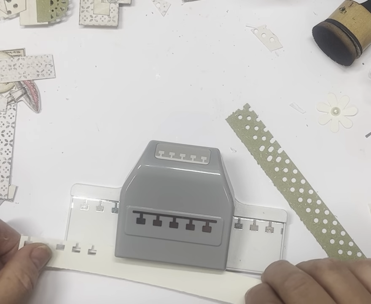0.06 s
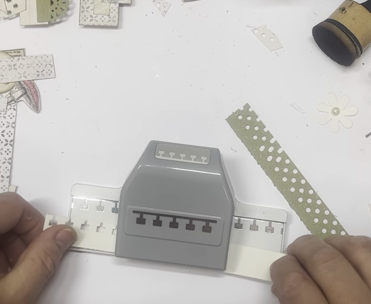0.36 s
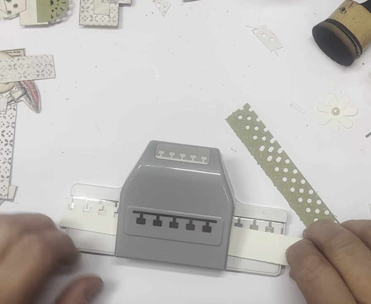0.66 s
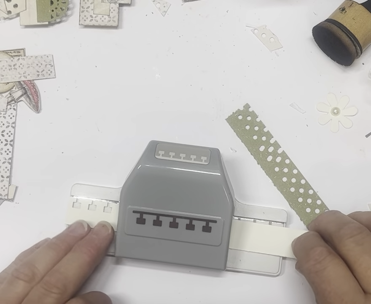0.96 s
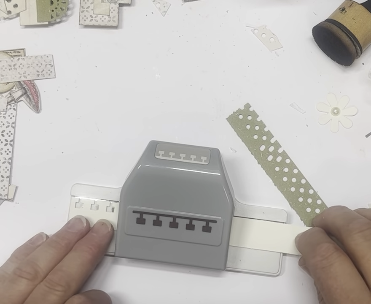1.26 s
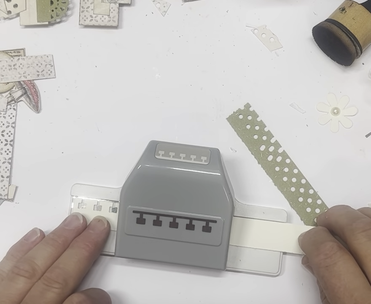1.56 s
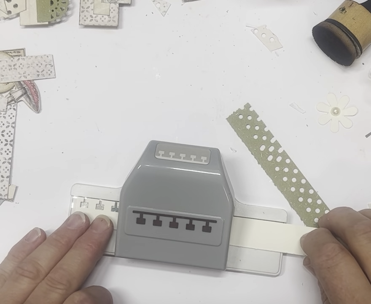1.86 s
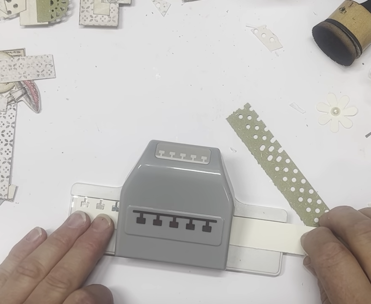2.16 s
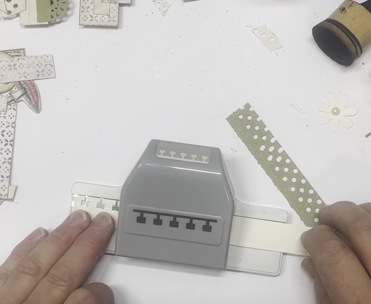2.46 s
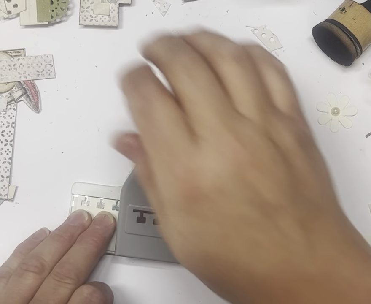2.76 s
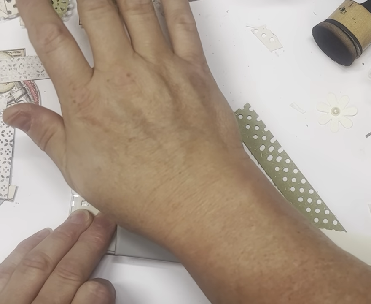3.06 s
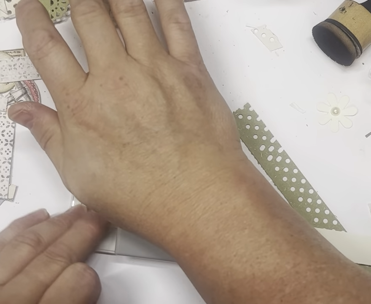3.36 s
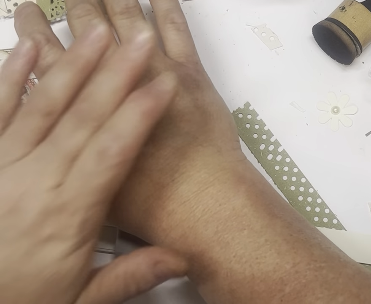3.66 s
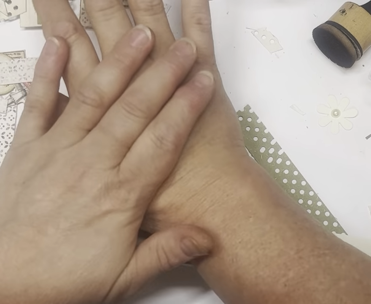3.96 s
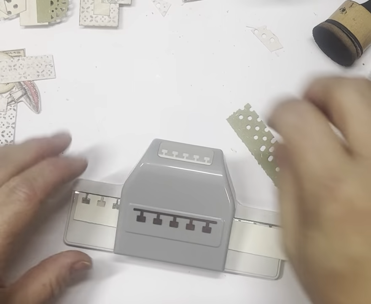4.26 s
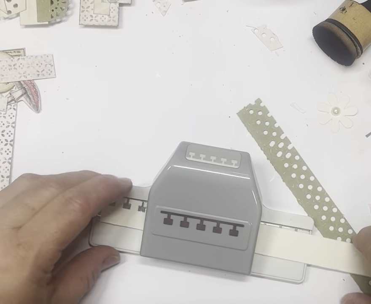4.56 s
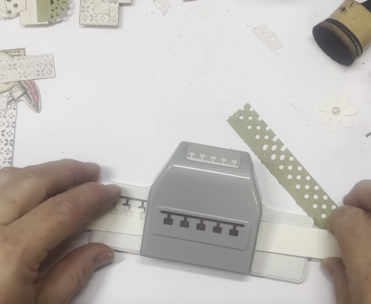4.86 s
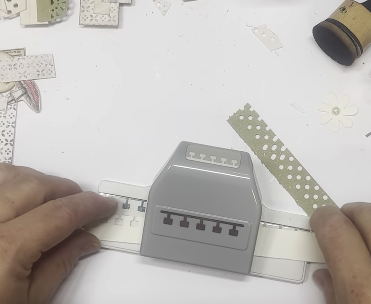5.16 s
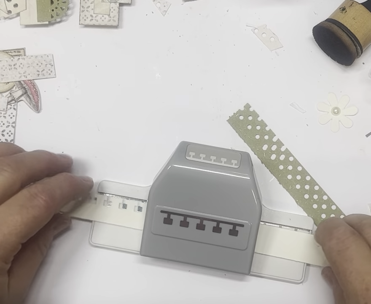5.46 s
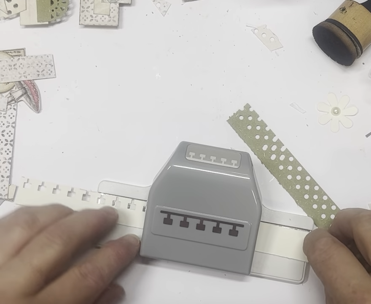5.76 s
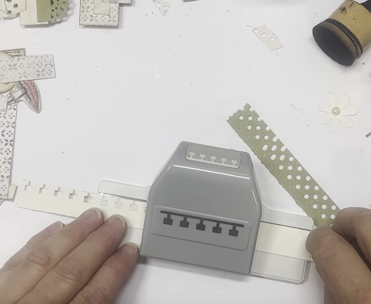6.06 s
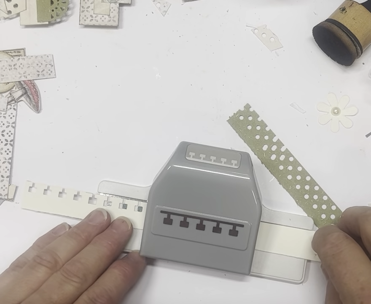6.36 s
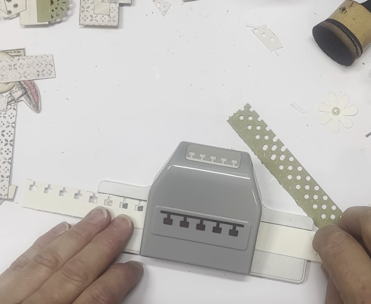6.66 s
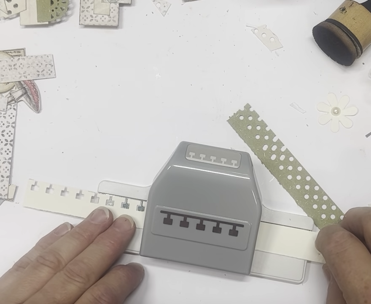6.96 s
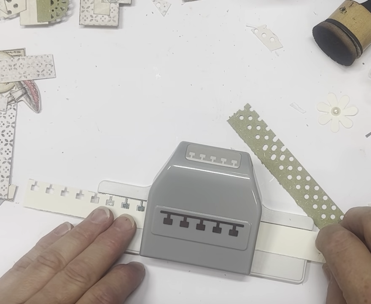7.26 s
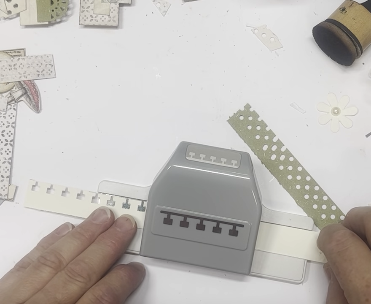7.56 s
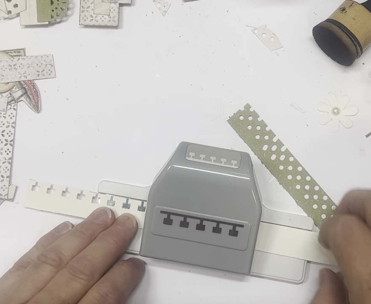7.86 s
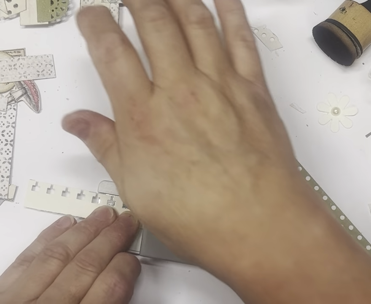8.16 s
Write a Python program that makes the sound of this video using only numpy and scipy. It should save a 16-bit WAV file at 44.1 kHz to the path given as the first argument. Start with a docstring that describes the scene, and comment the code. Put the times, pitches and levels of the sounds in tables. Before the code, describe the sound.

Over a low machine hum in a small room, a paper strip faintly rubs, ticks and squeaks as it is fed into a plastic hand punch. A palm lands softly on the lever, then the punch snaps through with one loud clunk that makes the desk boom. It releases with a short scrape and a faint spring ring. The strip slides along and the palm lands again, all close to the microphone.

```python
"""Over a low machine hum in a small room, a paper strip rubs, squeaks and ticks into a plastic hand punch. At 3
s a palm lands on the lever. At 3.8 s the dies snap through the paper and the housing clunks; the desk booms,
loose things on it shudder, and a limiter ducks. The dies scrape back and the return spring rings. From 4.4 s
the strip is slid along, and at the very end the palm lands again."""
import sys
import numpy as np
from scipy import signal
from scipy.fft import rfft, irfft, next_fast_len
from scipy.io import wavfile
from scipy.ndimage import uniform_filter1d, minimum_filter1d

SR = 44100
rng = np.random.default_rng(int(sys.argv[2]) if len(sys.argv) > 2 else 0)


def store_pcm(level_fs):
    """Save levels as 16-bit WAV."""
    pcm = np.round(np.clip(level_fs, -1, 1) * 32767).astype(np.int16)
    wavfile.write(sys.argv[1], SR, np.atleast_2d(pcm).T)


N = 366030
TIME = np.arange(N) / SR
CUTOFF_HZ = 16400


# snap spectrum: f/Hz, level/dB
SNAP_SPECTRUM = [(300, -25.5), (1200, 9.5), (1900, -4.5), (2400, -8.5), (3000, -2.5), (4200, 1),
                 (5300, -3.5), (6700, 0.5), (8500, -3.5), (9800, -14), (13000, -10.5), (15300, -4.5),
                 (17000, -15)]
def punch(snap_gain_db, knock_gain_db, rattle=.13, db_per_octave=49.5):
    """Contacts snap and knock the housing; loose parts rattle with each blow."""
    snaps, blows = np.zeros((2, 2, N))
    for s, snap_db, knock_db, hard_hz in contacts():
        bright_hz = CUTOFF_HZ * 2 ** (snap_db / db_per_octave)   # stronger is brighter
        add(snaps, s, from_db(snap_db) * lowpass(crunch(decay_s=.0046, spread=.16), bright_hz))
        force = signal.unit_impulse(4096) + rattle * crunch(decay_s=.0051, spread=.24)
        add(blows, s, from_db(knock_db) * lowpass(force, hard_hz))
    knocks = from_db(knock_gain_db) * convolve(blows, housing())
    return from_db(snap_gain_db) * colour(snaps, SNAP_SPECTRUM) + knocks


# dies cutting and returning: t/s, snap/dB, knock/dB, knock cutoff/Hz
DIE_CONTACTS = [(3.736, -42, -39, 2480), (3.7491, -28, -12, 1170), (3.7763, -25, -15.5, 1400),
                (3.7803, -16, -5.5, 2604), (3.804, -10.5, -11.5, 2040), (3.809, -10, -6, 2000),
                (4.029, -53, -33.5, 2200), (4.091, -42.5, -39, 1830), (4.106, -32.5, -25.5, 1910)]
# palm on lever: t/s, click/dB, knock/dB, knock cutoff/Hz
PALM_LANDINGS = [(3.038, -44, -28.5, 454), (8.260, -44, -29, 1010)]
# lever end stops, down then up: t/s, first rebound/dB
LEVER_STOPS = [(3.807, -3), (4.094, -29.5)]
def contacts(slack_s=.0058, heel_s=.044, rebound_s=.035, loss_db=10):
    """All impacts in the punch, columns as in DIE_CONTACTS."""
    rows = list(DIE_CONTACTS)
    for s, click_db, knock_db, hard_hz in PALM_LANDINGS:
        rows.append((s, click_db, click_db + 1, 1400))   # lever clicks
        rows.append((s + slack_s, click_db - 5.5, knock_db, hard_hz))   # slack taken up
        rows.append((s + heel_s, click_db - 5.5, knock_db + 1.5, 414))   # heel of the hand
    for s, db in LEVER_STOPS:   # housing rebounds on the desk: dull, no snap
        rows += [(s + (k + 1) * rebound_s, -np.inf, db - k * loss_db, 420) for k in range(2)]
    return [row for row in rows if row[0] < TIME[-1]]


# housing modes: f/Hz, level/dB, t60/s, left lead/rad
HOUSING_MODES = [(114.8, 1.5, 0.087, 0.091), (161, -4, 0.11, 0), (191, -8, 0.19, -1.465),
                 (261, 3.5, 0.047, -0.075), (268.5, 0, 0.12, -0.57), (304.2, -1.5, 0.14, -2.4),
                 (397, -4.5, 0.11, 0.94), (459, -8, 0.058, 0), (553, -4.5, 0.091, 0.42),
                 (581, -2, 0.092, 1), (671, -3, 0.036, 0.65), (838, -5.5, 0.033, .4), (931, -7, 0.026, .4),
                 (1233, -2.5, 0.027, 0.93), (1320, -2, 0.011, -0.35), (1500, -8.5, 0.02, 0.97),
                 (1670, -12.5, 0.024, 0), (2165, -13, 0.023, 0.87), (2629, -6, 0.023, -0.38)]
# mode radiation: f/Hz, left minus right/dB
HOUSING_BALANCE = [(180, -2.5), (340, -5.5), (650, 2.5), (1200, 1.5), (2300, -4.5)]
def housing():
    """Stereo impulse response of the housing on the desk top."""
    response = 0
    for k, (hz, db, t60_s, lead_rad) in enumerate(HOUSING_MODES):
        mode = np.array([ring(hz, t60_s, lead_rad / 2), ring(hz, t60_s, -lead_rad / 2)])
        balance = from_db(at_hz(HOUSING_BALANCE, hz) * np.array([[.5], [-.5]]))
        response += (-1) ** k * from_db(db) * mode * balance
    return response


# return spring modes: f/Hz, level/dB, t60/s
SPRING_MODES = [(3690, -68, .55), (3770, -69, .55), (6250, -72, .5), (9650, -79, .7)]
def spring():
    """The freed metal spring rings from the last die contact."""
    track = np.zeros(N)
    add(track, DIE_CONTACTS[-1][0], ring_modes(SPRING_MODES))
    return track


# hand's weight on or off the desk: t/s, level/dB, length/s
DESK_PUSHES = [(3.076, -7.5, 0.02), (3.756, -5, .0085), (3.773, -5.5, 0.012), (3.799, -4.5, 0.031),
               (3.827, 8, 0.011), (4.061, -1, 0.019), (4.127, -3.5, 0.018)]
# desk modes: f/Hz, level/dB, t60/s
DESK_MODES = [(36.18, -14, 1), (45.3, -9, .7), (65.5, 2, 0.41), (85, -11.5, 0.21)]
def desk(gain_db):
    """Slow pushes set the desk booming."""
    force = np.zeros(N)
    for s, db, length_s in DESK_PUSHES:
        push = np.sin(np.pi * np.minimum(TIME[:SR // 10] / length_s, 1)) ** 2
        add(force, s, from_db(db) * push / push.sum())
    return from_db(gain_db) * convolve(force, ring_modes(DESK_MODES))


# spectrum of loose things on the desk: f/Hz, level/dB
SHUDDER_SPECTRUM = [(70, -22.5), (120, -4), (200, -2), (265, 10.5), (340, -4), (410, 2.5), (520, -7),
                    (620, -9), (780, -26), (1500, -43), (4000, -69)]
def shudder(start_s=3.785, gain_db=-6.5, rise_s=.06, t60_s=.44):
    """Loose things on the desk shudder after the clunk and die away."""
    t = np.maximum(TIME - start_s, 0)
    envelope = (1 - np.exp(-(t / rise_s) ** 2)) * from_db(gain_db - 60 * t / t60_s)
    return colour(envelope * pair(spread=.37), SHUDDER_SPECTRUM)


# die scrape spectrum: f/Hz, level/dB
SCRAPE_SPECTRUM = [(120, -9), (280, -7), (420, -3), (600, 6), (800, 10), (1500, 13.5), (2100, -10.5),
                   (3500, 9), (5000, 0), (7500, 3), (9500, -11.5), (12500, -8.5), (16000, -17)]
def die_scrape(gain_db):
    """On release the dies drag back out of the paper."""
    drag = from_db(gain_db) * swell(start_s=4.027, length_s=.104, peakiness=.3)
    return colour(drag * friction(rough_db=-1, grain_hz=190), SCRAPE_SPECTRUM)


# pushes on the strip: t/s, length/s, rub/dB, hiss/dB, peakiness, start f/Hz, end f/Hz
STRIP_SLIDES = [(.13, .30, -67, -72, 0.18, 5800, 8400), (.435, 0.11, -62.5, -69, 1.7, 8400, 8600),
                (.74, 0.22, -75.5, -72.5, 1.3, 6000, 7300), (4.43, .13, -63.5, -69, 1.3, 7140, 7400),
                (4.56, 0.18, -73.5, -75.5, 0.53, 7200, 8600), (4.757, 0.24, -68.5, -68.5, 0.17, 8070, 8400),
                (5.075, 0.36, -68.5, -68, 1.5, 8200, 6200)]
# paper rub and hiss spectra: f/Hz, level/dB
RUB_SPECTRUM = [(600, -2), (1200, -9), (1500, 0), (1900, -12), (2600, -4), (3150, -1.5), (3800, -4.5),
                (5200, -6), (7000, -19.5), (12000, -34.5)]
HISS_SPECTRUM = [(3500, -41.5), (5500, -1), (6800, 0.5), (8200, -2), (9600, -11), (12500, -20.5),
                 (15200, -7), (17000, -14)]
def paper(rub_gain_db, hiss_gain_db, glide_gain_db):
    """The unevenly pushed strip rubs and hisses, with a gliding resonance."""
    rub, hiss, glide = np.zeros((3, N))
    uneven = from_db(1.5 * drift(rate_hz=18))
    for s, length_s, rub_db, hiss_db, peakiness, start_hz, end_hz in STRIP_SLIDES:
        speed = swell(s, length_s, peakiness) * uneven
        glide_hz = np.interp(TIME, [s, s + length_s], [start_hz, end_hz])
        rub += from_db(rub_db) * speed
        hiss += from_db(hiss_db) * speed
        glide += from_db(hiss_db) * speed * narrow_noise(glide_hz, width_hz=1300)
    rub = colour(rub * friction(rough_db=3.2, grain_hz=90), RUB_SPECTRUM)
    hiss = colour(hiss * friction(rough_db=3.2, grain_hz=220), HISS_SPECTRUM)
    return from_db(rub_gain_db) * rub + from_db(hiss_gain_db) * hiss + from_db(glide_gain_db) * glide


# edge catches: t/s, level/dB, ping f/Hz
EDGE_TICKS = [(0.0627, -51, 2820), (0.118, -54, 2840), (0.175, -39, 6490), (0.183, -44, 5730),
              (0.5124, -37.5, 3090), (1.294, -57, 2530), (1.805, -55.5, 2590), (2.4756, -47, 2800),
              (2.4947, -50, 2600), (4.397, -50, 4520), (4.7679, -43, 2780), (4.9954, -56, 3180),
              (5.0925, -39, 3380), (5.1652, -43, 2960), (5.1701, -44, 2810), (5.3944, -49, 3270),
              (7.8249, -51, 2730)]
# tick spectrum: f/Hz, level/dB
TICK_SPECTRUM = [(700, -8), (1500, 4.5), (2100, -9), (3200, 3), (4500, -3), (7500, 1), (9000, -7),
                 (11500, -16), (15000, -18), (17000, -27.5)]
def ticks(snap_gain_db, ping_gain_db):
    """The strip's edge catches: a tiny snap and a ping of the plastic guide."""
    snaps, pings = np.zeros((2, 2, N))
    for s, db, hz in EDGE_TICKS:
        add(snaps, s, from_db(db) * crunch(decay_s=.002, spread=.088))
        add(pings, s, from_db(db) * ring(hz, t60_s=.03))
    return from_db(snap_gain_db) * colour(snaps, TICK_SPECTRUM) + from_db(ping_gain_db) * pings


# stick-slip chirps: t/s, level/dB, f/Hz, length/s
SLIP_CHIRPS = [(0.31, -62, 2800, 0.054), (0.297, -68, 1474, 0.083), (4.47, -64, 1550, 0.024),
               (4.607, -61, 2940, 0.032), (4.796, -56.5, 3200, 0.038), (5.18, -59, 3100, 0.16),
               (5.666, -56.5, 1508, 0.031)]
def squeaks():
    """Paper and fingers stick and slip on the plastic."""
    return sum(from_db(db) * swell(s, length_s, peakiness=.69) * narrow_noise(hz, width_hz=.12 * hz)
               for s, db, hz, length_s in SLIP_CHIRPS)


# hand strokes: t/s, length/s, level/dB
HAND_STROKES = [(0, 0.96, -74.5), (2.39, 0.15, -74), (2.68, 0.25, -74), (3.28, .17, -73.5), (4.3, 1.7, -76),
                (7.98, 0.19, -75)]
# skin friction spectrum: f/Hz, level/dB
SKIN_SPECTRUM = [(1000, -6), (3000, 3), (7000, 2), (10000, -16.5), (16000, -15.5)]
def hands():
    """Skin brushes over paper and lever."""
    speed = sum(from_db(db) * swell(s, length_s, peakiness=.59) for s, length_s, db in HAND_STROKES)
    return colour(speed * friction(rough_db=2, grain_hz=40), SKIN_SPECTRUM)


# machine tones: f/Hz, level/dB, waver depth
HUM_TONES = [(33.6, -51, 2.5), (47.35, -36.5, .4), (52.2, -33, .14), (62.3, -47, 1.5), (71, -43, 1.5),
             (80.3, -40.5, .12)]
def hum(waver_hz):
    """A machine's low tones waver and beat."""
    tones = 0
    for hz, db, depth in HUM_TONES:
        waver = 1 + depth * (drift(waver_hz) + 1j * drift(waver_hz))
        carrier = np.exp(2j * np.pi * (hz * TIME + rng.random()))
        tones += from_db(db) * rms_one(np.real(waver * carrier))
    return tones


# room air spectrum: f/Hz, level/dB
AIR_SPECTRUM = [(20, -27), (45, 15.5), (90, 5), (200, -7), (420, -7.5), (620, -18.5), (850, -19),
                (1150, -26), (1600, -26), (1900, -20.5), (2450, -25), (3100, -36), (4400, -40), (5100, -44),
                (6000, -36.5), (7200, -49), (10000, -55.5), (16000, -60.5)]
# drone envelope: t/s, level/dB
DRONE_LEVELS = [(0, -76), (4.5, -65), (5.6, -59.5), (8.3, -61.5)]
def air(rush_db, whine_db):
    """A steady rush of air, a soft growing drone and a thin whine."""
    drone_db = np.interp(TIME, *np.transpose(DRONE_LEVELS))
    drone = from_db(drone_db) * narrow_noise(453, width_hz=170)
    rush = from_db(rush_db) * colour(pair(spread=.55), AIR_SPECTRUM)
    whine = from_db(whine_db) * narrow_noise(3840, width_hz=49)
    return rush + drone + whine


# reverb bands: f/Hz, level/dB, t60/s
ROOM_BANDS = [(119.3, -7, 0.36), (304.4, -10.5, 0.42), (596, -15.5, 0.36), (1200, -10.5, 0.3),
              (3012, -10.5, 0.25), (6900, -10, 0.25), (15000, -22, .26)]
def room(x, wet_db, build_up_s):
    """Reflections build into a diffuse tail that dies band by band."""
    t = TIME[:SR * 2 // 3]
    edges_hz = np.geomspace(100, 17000, 16)
    onset = 1 - np.exp(-(t / build_up_s) ** 2)
    white = rng.standard_normal((2, 2, len(t)))
    tail = 0
    for k, (low, high) in enumerate(zip(edges_hz, edges_hz[1:])):
        hz = np.sqrt(low * high)
        fade = from_db(-60 * t / at_hz(ROOM_BANDS, hz, column=2))
        bandpass = signal.butter(2, [low, high], "band", fs=SR, output="sos")
        band = signal.sosfilt(bandpass, white[k % 2]) * onset * fade
        band /= np.linalg.norm(band, axis=1, keepdims=True)
        tail += band * np.sqrt(2 * (high - low) / SR) * from_db(at_hz(ROOM_BANDS, hz))
    return from_db(wet_db) * convolve(x, tail)


def from_db(db):
    return 10 ** (np.asarray(db) / 20)


def rms_one(x):
    return x / np.sqrt(np.mean(x ** 2) + 1e-20)


def at_hz(table, hz, column=1):
    """Interpolate a column over log frequency."""
    table = np.array(table)
    return np.interp(np.log(np.maximum(hz, 1)), np.log(table[:, 0]), table[:, column])


def add(track, start_s, sound):
    start = round(start_s * SR)
    track[..., start:start + sound.shape[-1]] += sound[..., :N - start]


def convolve(x, response):
    return signal.oaconvolve(np.atleast_2d(x), np.atleast_2d(response), axes=-1)[:, :N]


def lowpass(x, hz):
    return signal.sosfilt(signal.butter(2, np.clip(hz, 50, .45 * SR), fs=SR, output="sos"), x)


def colour(x, spectrum, size=4096):
    """Minimum-phase filter; white noise keeps its power."""
    magnitude = from_db(at_hz(spectrum, np.fft.rfftfreq(size, 1 / SR)))
    cepstrum = irfft(np.log(magnitude))
    cepstrum[1:size // 2] *= 2
    cepstrum[size // 2 + 1:] = 0
    response = irfft(np.exp(rfft(cepstrum)))
    return convolve(x, response / np.linalg.norm(response))


def drift(rate_hz, control_hz=1500, size=2 ** 14):
    """Smooth random signal, unit rms."""
    hz = np.fft.rfftfreq(size, 1 / control_hz)
    slow = irfft(rfft(rng.standard_normal(size)) / (1 + (hz / rate_hz) ** 4))
    return np.interp(TIME * control_hz, np.arange(size), rms_one(slow))


def pair(spread, size=N):
    """Stereo white noise; spread = side / mid."""
    mid, side = rng.standard_normal((2, size))
    return (mid + spread * side * np.array([[1], [-1]])) / np.hypot(1, spread)


def crunch(decay_s, spread, size=4096):
    """A spray of tiny fractures: a decaying noise burst."""
    return pair(spread, size) * np.exp(-TIME[:size] / decay_s)


def friction(rough_db, grain_hz):
    """Fibres catch and slip: grainy hiss."""
    return rms_one(pair(spread=.12) * from_db(rough_db * drift(grain_hz)))


def ring(hz, t60_s, lead_rad=0):
    """One second of a struck mode."""
    t = TIME[:SR]
    return np.sin(2 * np.pi * hz * t + lead_rad) * from_db(-60 * t / t60_s)


def ring_modes(modes):
    return sum(from_db(db) * ring(hz, t60_s) for hz, db, t60_s in modes)


def narrow_noise(hz, width_hz):
    """A randomly driven resonance; hz may glide."""
    phase = 2 * np.pi * np.cumsum(hz * np.ones(N)) / SR
    return (drift(width_hz / 2) * np.cos(phase) + drift(width_hz / 2) * np.sin(phase)) / np.sqrt(2)


def swell(start_s, length_s, peakiness):
    """Speed of one stroke: 0 at the ends, 1 halfway."""
    progress = np.clip((TIME - start_s) / length_s, 0, 1)
    return (4 * progress * (1 - progress)) ** peakiness


def delay_left(x, lag_s):
    """Sound reaches the left microphone later."""
    size = next_fast_len(N + SR // 100)
    shift = np.exp(-2j * np.pi * np.fft.rfftfreq(size, 1 / SR) * lag_s)
    left = irfft(rfft(x[0], size) * shift, size)[:N]
    return np.array([left, x[-1]])


def scene():
    """Punch slightly to the right, with reverb; boom, hum and air stay dry."""
    near = punch(snap_gain_db=2.5, knock_gain_db=-6) + spring() + hands() + die_scrape(gain_db=-47)
    near += paper(rub_gain_db=5, hiss_gain_db=3.5, glide_gain_db=3) + squeaks()
    near += ticks(snap_gain_db=-5, ping_gain_db=-10) + shudder()
    near = delay_left(near, lag_s=.00002)
    low = delay_left(desk(gain_db=1.5) + hum(waver_hz=1), lag_s=.00015) * from_db([[-.3], [.3]])
    return near + room(near, wet_db=2.5, build_up_s=.0021) + low + air(rush_db=-44.5, whine_db=-85)


# stereo width: f/Hz, side gain/dB
SIDE_GAINS = [(70, 0), (120, -11.5), (200, -5), (300, 1), (1100, 5), (1650, -2), (2100, -29.5),
              (2900, -8.5), (4000, -5), (5500, 3.5), (15000, 0.5)]
def microphones(x, low_cut_hz=26):
    """A close pair: deep bass is lost, width varies with frequency."""
    x = signal.sosfilt(signal.butter(2, low_cut_hz, "high", fs=SR, output="sos"), x)
    size = next_fast_len(N + SR // 10)
    side_gain = from_db(at_hz(SIDE_GAINS, np.fft.rfftfreq(size, 1 / SR)))
    side = irfft(rfft((x[0] - x[1]) / 2, size) * side_gain, size)[:N]
    return x.mean(axis=0) + side * np.array([[1], [-1]])


def record(dry, ceiling=.9, hold_s=.018, release_db_per_s=45):
    """Microphones, then a limiter that ducks, holds and recovers, then a steep treble cut."""
    x = microphones(dry)
    over_db = np.maximum(20 * np.log10(np.abs(x).max(axis=0) / ceiling + 1e-9), 0)
    half_hold = int(hold_s * SR / 2)
    held_db = -minimum_filter1d(-over_db, 2 * half_hold + 1, origin=half_hold)
    release_db = release_db_per_s * TIME
    duck_db = np.maximum.accumulate(held_db + release_db) - release_db
    gain_db = uniform_filter1d(minimum_filter1d(-duck_db, size=129), size=129)   # 3 ms attack
    treble_cut = signal.ellip(10, .2, 80, CUTOFF_HZ, fs=SR, output="sos")
    return signal.sosfilt(treble_cut, x * from_db(gain_db))


dry = scene()
out = record(dry)
store_pcm(out)
```